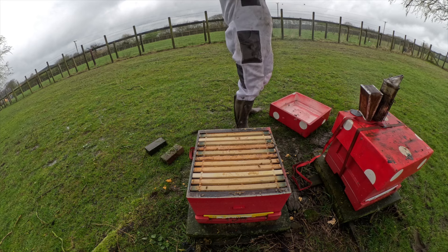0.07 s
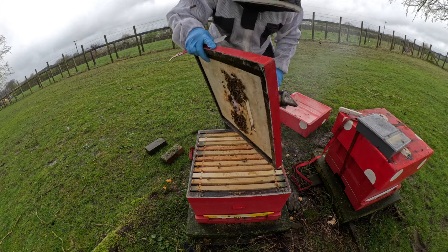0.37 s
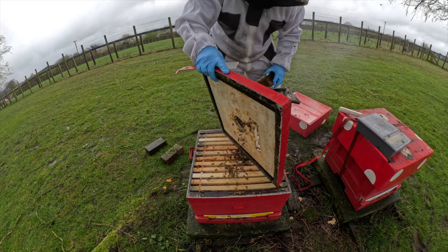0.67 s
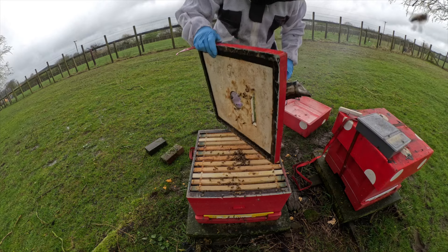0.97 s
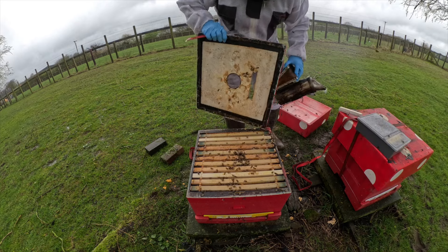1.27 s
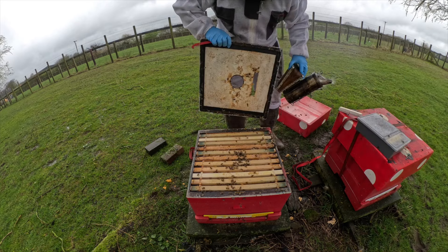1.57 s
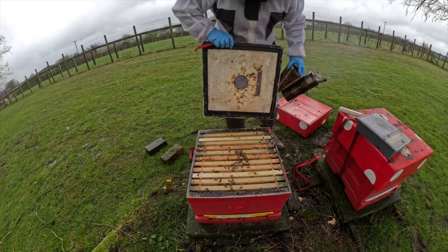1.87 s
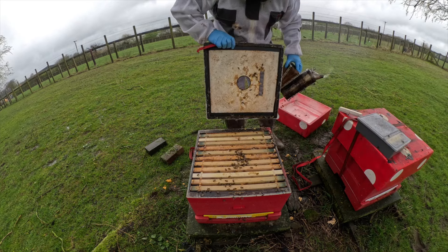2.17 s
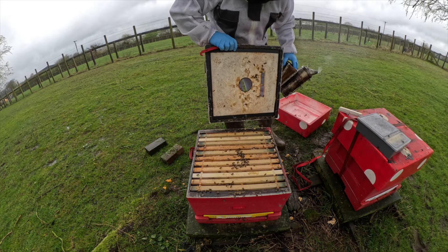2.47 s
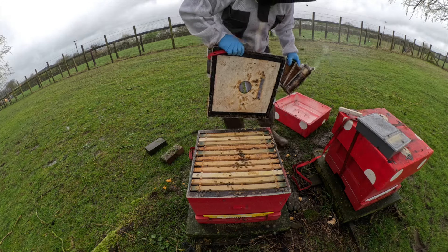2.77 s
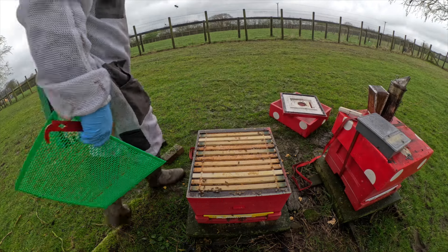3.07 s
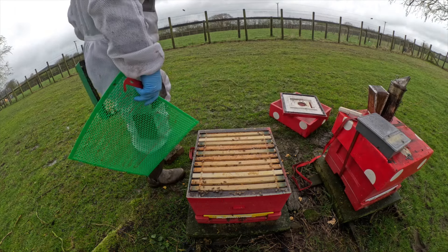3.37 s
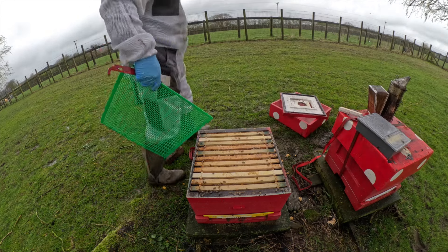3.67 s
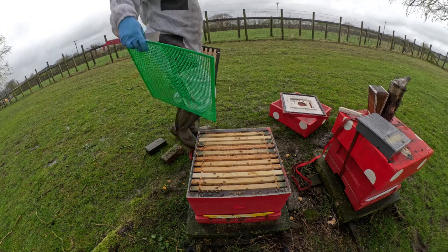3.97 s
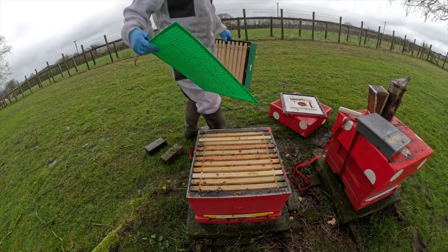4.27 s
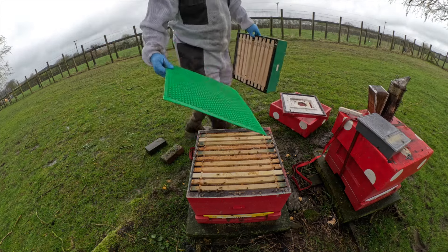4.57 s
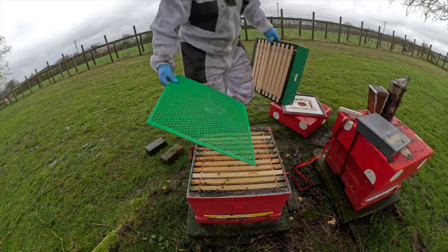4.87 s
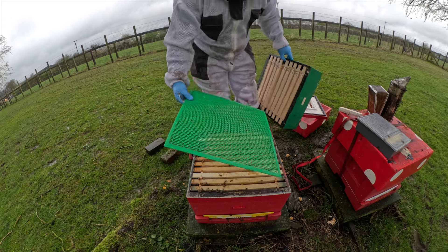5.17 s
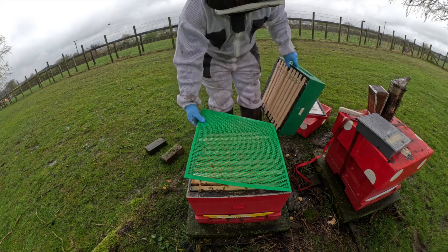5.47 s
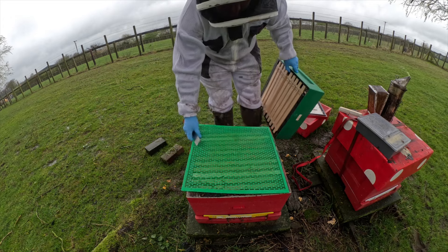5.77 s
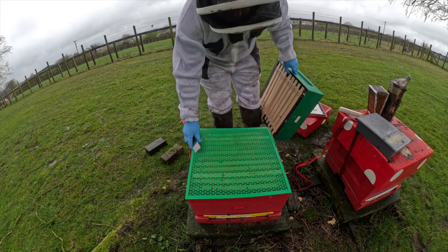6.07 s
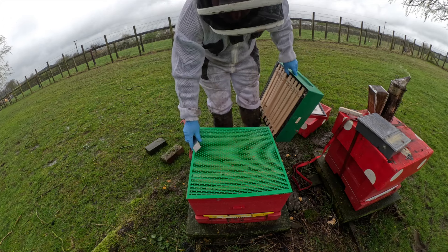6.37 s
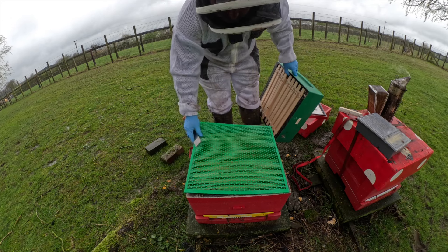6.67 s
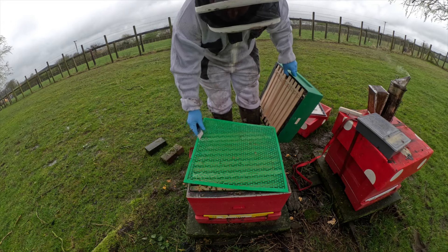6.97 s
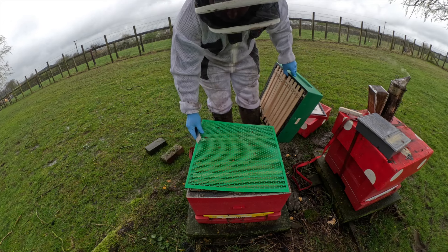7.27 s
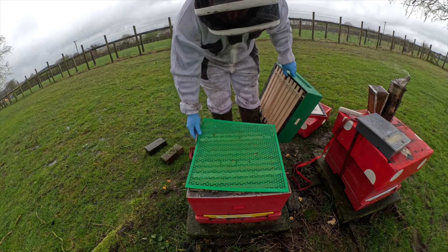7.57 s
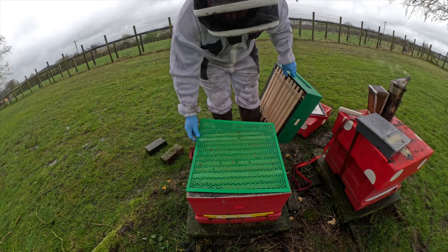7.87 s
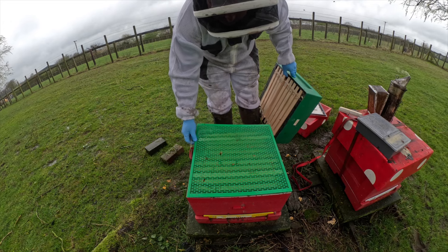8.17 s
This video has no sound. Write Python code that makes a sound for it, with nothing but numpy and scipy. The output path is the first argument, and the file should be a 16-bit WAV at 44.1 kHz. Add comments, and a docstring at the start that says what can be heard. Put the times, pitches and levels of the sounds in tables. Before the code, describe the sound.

One hard, hollow knock with a brief rattle cuts through the steady buzzing of bees right beside the microphone. A few bees dart past while a protective suit rustles and boots thud softly on turf. Light plastic clicks and a brief scrape follow as a grid goes onto the hive. The bees keep humming over a soft open-air rumble, with no echo.

```python
"""Open beehive on a lawn

Close to the frames, groups of bees hum, one pulse to a wing beat, and swell in turn. A sharp knock, likely
the smoker against the hive roof, booms and rattles once. The keeper steps round in a rustling suit and lays
a plastic grid on the frames with light clicks and a scrape. Far off: a faint bird and open-air rumble."""
import sys
import numpy as np
from scipy import signal
from scipy.fft import rfft, irfft, next_fast_len
from scipy.io import wavfile

SR = 44100
rng = np.random.default_rng(int(sys.argv[2]) if len(sys.argv) > 2 else 0)


def to_wav(s):
    """Save 16-bit WAV."""
    ch = np.atleast_2d(s).T  # columns
    pcm = np.round(np.clip(ch, -1, 1) * 32767)  # PCM
    wavfile.write(sys.argv[1], SR, pcm.astype(np.int16))


N = 363384
T = np.arange(N) / SR


def bees(wing_hz, tone, count, spread, wander, flutter_db):
    """Each bee sends one pulse per wing beat; its pitch wanders and its loudness changes as it turns."""
    t, pulses = T[::64], np.zeros(N + 1)
    mood = drift(t, 5)  # neighbours speed up and slow down together
    for offset in np.linspace(-1, 1, count):
        waver = drift(t, 3.5) + .45 * drift(t, 24) + .35 * mood
        hz = wing_hz * np.exp(spread * offset + wander * waver)
        beats = np.cumsum(hz) * t[1] + rng.random()
        beat_s = np.interp(np.arange(1, beats[-1]), beats, t)
        strength = undb(flutter_db * drift(beat_s, 7)) * np.exp(-offset ** 2 / 2)
        sample, fraction = (beat_s * SR).astype(int), beat_s * SR % 1
        pulses[sample] += strength * (1 - fraction)
        pulses[sample + 1] += strength * fraction
    return unit(colour(pulses[:N] - pulses.mean(), tone))


def near_bees():
    """Bees by the microphone fan on the combs, whine with folded wings, dart past and hover."""
    # Bouts of wing beats. Each row: peak in seconds, half width in seconds, relative level in dB.
    fan_bouts = [(0.14, 0.02, -51.5), (0.41, 0.072, -50), (0.8, .12, -54.5), (1.17, 0.24, -55.5),
                 (1.71, .16, -48.5), (2.26, .13, -50.5), (2.53, 0.12, -47.5), (2.88, 0.096, -48.5),
                 (3.22, 0.24, -55), (3.69, 0.096, -49), (4.3, 0.12, -54), (6.4, 0.17, -61.5),
                 (6.77, 0.091, -51.5)]
    dart_passes = [(3.27, 0.13, -48), (3.76, 0.16, -52), (4.33, 0.21, -59)]
    # Slow swells of the hum. Each row: time in seconds, relative level in dB.
    whine_levels = [(0, -89), (.35, -53.5), (1.1, -63), (1.6, -56.5), (2.85, -55), (3.1, -67.5),
                    (4.5, -59.5), (5.6, -56.5), (6.9, -53), (8.24, -54.5)]
    hover_levels = [(0, -65.5), (1.3, -66.5), (2.2, -60), (4.5, -64.5), (5.8, -55), (8.24, -55.5)]
    # Spectra of one wing beat. Each row: frequency in Hz, gain in dB.
    fan_tone = [(95, -32), (140, 1), (175, 1.5), (225, -2), (300, -20), (400, -27), (600, -19.5),
                (1200, -17), (2500, -38.5), (6000, -60)]
    whine_tone = [(250, -27.5), (430, 4), (560, 1), (950, -6), (1450, -12.5), (2400, -33), (6000, -63.5)]
    dart_tone = [(130, -50), (230, 8.5), (310, 10), (500, -10), (1200, -28), (2500, -26), (6000, -56.5)]
    hover_tone = [(110, -26), (220, -3.5), (330, -1), (450, -1), (680, -2), (900, -9.5), (1150, -8),
                  (1600, -24), (2500, -40), (6000, -57.5)]
    fanning = bees(188, fan_tone, count=20, spread=.22, wander=.055, flutter_db=2.8)
    whining = bees(482, whine_tone, count=12, spread=.11, wander=.04, flutter_db=3.2)
    darting = bees(262, dart_tone, count=9, spread=.11, wander=.033, flutter_db=3)
    hovering = bees(225, hover_tone, count=13, spread=.05, wander=.028, flutter_db=3.9)
    hovering *= undb(drift(T, 5.5))
    stragglers = bees(205, hover_tone, count=9, spread=.14, wander=.04, flutter_db=1.4)
    return (fanning * surges(fan_bouts, rest_db=-60.5) * undb(-1)
            + whining * swell(whine_levels) * undb(-2.5)
            + darting * surges(dart_passes, rest_db=-74)
            + (hovering + stragglers * undb(-5.5)) * swell(hover_levels))


def colony():
    """Down in the hive many wing beats blur into a drone, with a fine hiss of wings between the frames."""
    # Swells of drone and hiss. Each row: time in seconds, relative level in dB.
    drone_levels = [(0, -63), (1.4, -62), (2.55, -56.5), (3.1, -62), (4.6, -59.5), (5.05, -55.5),
                    (5.4, -60), (8.24, -62)]
    hiss_levels = [(0, -95), (4.5, -87), (5.4, -78.5), (8.24, -77)]
    # Their spectra. Each row: frequency in Hz, gain in dB.
    drone_tone = [(200, -21.5), (400, 8.5), (600, -3.5), (1000, 1.5), (1350, -1), (1800, -7.5),
                  (2500, -22.5), (4000, -23.5), (6500, -32), (9000, -48)]
    hiss_tone = [(2000, -28), (3200, -18), (3900, -5), (4850, 2.5), (5600, -2.5), (6400, -11.5),
                 (7150, -10.5), (8100, -14), (9200, -21.5), (15000, -28.5)]
    drone = bees(235, drone_tone, count=24, spread=.25, wander=.05, flutter_db=3.5)
    hiss = noise(hiss_tone) * swell(hiss_levels) * undb(1.13 * drift(T, 13))
    return drone * swell(drone_levels) * undb(1.5) + hiss


def knock():
    """A quick run of contacts rings the hollow roof and the smoker's tin; the hard ones crack."""
    # Smoker meeting roof. Each row: start in seconds, relative level in dB, contact time in ms.
    contacts = [(0.4885, -22.9, 0.07), (0.49001, -10.3, 0.29), (0.49212, -9.0, 0.15), (0.49472, -9.1, 0.05),
                (0.49772, -14.1, 0.29), (0.50176, -14.1, 0.72), (0.50587, -24.9, 0.18),
                (0.51424, -39.5, 0.1), (0.5355, -42, 0.22), (0.54607, -40.5, 0.17), (0.5535, -37, 0.21),
                (0.56317, -40, 0.27), (0.577, -48, 0.25)]
    # Modes of roof and tin. Each row: frequency in Hz, gain in dB, seconds to fall 60 dB.
    roof_modes = [(133, -0.8, 0.137), (180, 2.9, 0.056), (213, -0.9, 0.085), (324, -5.3, 0.101),
                  (476, -8.7, 0.131), (534, -1.4, 0.045), (602, 2.9, 0.062), (683, 5.2, 0.021),
                  (791, 1.2, 0.03), (866, -9.1, 0.088), (976, 3.0, 0.057), (1100, -6.0, 0.062),
                  (1200, -0.2, 0.019), (1276, -4.2, 0.042), (1358, 2.2, 0.039), (1490, -2.2, 0.043),
                  (1644, 0.4, 0.015), (1823, -0.3, 0.066), (2052, -14.0, 0.042), (2444, 0.5, 0.011),
                  (2636, -8.0, 0.039), (2794, -14.3, 0.029), (3052, -13.3, 0.037), (3251, -9.0, 0.03),
                  (3773, -8.2, 0.036)]
    tin_modes = [(4020, -12, .018), (5400, -14, .018), (6450, -10, .018), (6950, -14, .018),
                 (9600, -11, .018), (12500, -17, .015)]
    # Spectrum of the crack. Each row: frequency in Hz, gain in dB.
    crack_tone = [(60, -10), (300, -8), (1200, -10), (2500, -10.5), (4000, -7.5), (5000, -16),
                  (7000, -18.5), (9500, -11.5), (13000, -22.5), (16000, -30)]
    t, pushes, cracks = T[:SR // 2], np.zeros(N), np.zeros(N)
    fade = (np.exp(-t / .0014) + .22 * np.exp(-t / .0105)
            + .014 * np.exp(-t / .033) + .0015 * np.exp(-t / .08))
    for start, db, contact_ms in contacts:
        push = t * np.exp(-t * 2000 / contact_ms)
        hardness = 1 / (1 + (contact_ms / .13) ** 2)
        add(pushes, start, undb(db) * push / push.sum())
        add(cracks, start, undb(db) * hardness * fade * rng.standard_normal(len(t)))
    boom = signal.fftconvolve(pushes, ring(roof_modes, t) + ring(tin_modes, t))[:N]
    out = undb(.5) * boom + undb(3.5) * colour(cracks, crack_tone)
    # a deep thud as the blow shakes the microphone
    add(out, .51, ring([(19, -24.5, .19), (65, -36.5, .12)], t))
    add(out, .5445, ring([(7900, -58, .07), (11900, -66, .05)], t))  # the tin pings on the bounce
    return out


def suit():
    """Cloth rubs on cloth and the mesh snaps with each stroke; the suit flaps dully as the keeper shifts."""
    # Bending and reaching. Each row: start in seconds, length in seconds, relative level in dB.
    strokes = [(0, 0.29, -72), (.62, 0.15, -77), (1.42, 0.072, -79.5), (2.964, 0.17, -63),
               (3.129, 0.037, -59), (3.18, 0.7, -72.5), (3.335, 0.11, -70.5), (3.51, 0.4, -74.5),
               (3.59, 0.11, -68), (3.986, 0.51, -68), (4.272, 0.097, -64), (4.583, 0.062, -70),
               (4.83, 0.3, -75), (5.116, 0.056, -65)]
    # Shifts of weight. Each row: peak in seconds, half width in seconds, level in dB.
    shifts = [(0.05, .25, -67), (3.22, 0.23, -55), (4.15, 0.79, -60), (5.2, 0.41, -57.5), (7.45, .7, -61)]
    # Spectra of rustle, snap and flap. Each row: frequency in Hz, gain in dB.
    cloth_tone = [(300, -7.5), (1500, 5.5), (3000, 6), (4500, 2), (6000, 3.5), (7500, -2), (9200, -2),
                  (12000, -7), (15500, -10)]
    snap_tone = [(1500, -28), (4000, -9), (8500, 0), (12000, -3.5), (15500, -5.5)]
    flap_tone = [(30, -13), (85, 1), (130, -2), (330, -8), (700, -23), (2000, -48)]
    attack_s, release_s, rest_db = .022, .016, -83
    power = undb(rest_db) ** 2
    for start, length, db in strokes:
        attack = np.clip((T - start) / attack_s, 0, 1)
        release = np.exp(-np.clip(T - start - length, 0, 1) / release_s)
        power += (undb(db) * attack * release) ** 2
    cloth = rubbing(cloth_tone, catches_per_s=420, hiss=1)
    snaps = rubbing(snap_tone, catches_per_s=60, hiss=0)
    rustle = cloth * undb(-.16 + .9 * drift(T, 70)) + snaps * undb(-8.5)
    return rustle * np.sqrt(power) + noise(flap_tone) * surges(shifts, rest_db=-76)


def grid_clicks():
    """Taps on plastic land edge first, then flat; each contact wakes its own range and mix of modes."""
    # Taps of grid and tool. Each row: start in seconds, relative level in dB, low and high band edge in Hz.
    taps = [(0.053, -52, 7000, 9500), (2.43, -57, 2000, 5000), (3.178, -50, 6000, 12000),
            (3.301, -50, 3980, 9900), (3.382, -58, 5000, 13000), (3.63, -51.5, 2200, 5000),
            (3.8887, -40.5, 580, 3840), (4.169, -52, 7000, 9850), (4.447, -56, 1600, 2580),
            (4.985, -48, 1880, 5530), (5.0494, -43.5, 1480, 2430), (5.411, -58, 2490, 6000),
            (5.527, -49.5, 1800, 7500), (5.721, -55, 2800, 4600), (5.741, -58.5, 6000, 8900),
            (5.928, -57, 1200, 3800)]
    # Modes of grid and hive rim. Each row: frequency in Hz, gain in dB, seconds to fall 60 dB.
    grid_modes = [(673, 5.5, 0.067), (1140, 5.5, 0.02), (1360, -6, 0.025), (1600, 3, 0.026),
                  (1900, -4, 0.03), (2260, -5, 0.015), (2860, -5, 0.01), (3450, -8.5, 0.024),
                  (5600, -8, 0.011), (8100, -24, 0.013)]
    bounce_s, bounce_db = .004, 1.5
    t, out = T[:SR // 8], np.zeros(N)
    for start, db, low_hz, high_hz in taps:
        band = signal.butter(2, [low_hz, high_hz], "band", fs=SR, output="sos")
        for delay, contact_db in ((0, db), (bounce_s, db + bounce_db)):
            modes = [(hz * (1 + .02 * rng.standard_normal()), gain + 2 * rng.standard_normal(), t60)
                     for hz, gain, t60 in grid_modes]
            tick = .8 * np.exp(-t / .003) * rng.standard_normal(len(t))
            add(out, start + delay, undb(contact_db) * signal.sosfilt(band, ring(modes, t) + tick))
    return out


def grid_scrape():
    """The plastic grid drags briefly over the hive rim."""
    # Course of the slide. Each row: time in seconds, level in dB.
    levels = [(0, -110), (5.06, -100), (5.11, -62), (5.14, -50.5), (5.18, -58.5), (5.22, -60), (5.26, -69),
              (5.32, -100)]
    # Spectrum of plastic on the rim. Each row: frequency in Hz, gain in dB.
    tone = [(800, -19), (1400, -0.5), (1750, 4.5), (2200, -5.5), (2750, -5), (3400, -17), (8000, -34)]
    return rubbing(tone, catches_per_s=900, hiss=.4) * swell(levels)


def steps():
    """A boot gives one or two dull cycles on soft ground."""
    # Boots on turf. Each row: start in seconds, level in dB, pitch in Hz.
    footfalls = [(3.303, -30, 105), (5.691, -38, 95)]
    t, out = T[:SR // 8], np.zeros(N)
    for start, db, hz in footfalls:
        add(out, start, undb(db) * np.sin(2 * np.pi * hz * t) * np.exp(-(t / .0086) ** 2))
    return out


def sizzle():
    """A thin, flickering band of hiss over the open frames sinks in pitch."""
    # Swell of the hiss. Each row: time in seconds, level in dB.
    levels = [(4.9, -105), (5.3, -85), (6.4, -82.5), (7.2, -88)]
    # Its glide. Each row: time in seconds, band centre in Hz.
    glide = [(5.3, 7900), (5.8, 7550), (6.2, 7020)]
    low_noise = signal.sosfilt(signal.butter(2, 600, fs=SR, output="sos"), rng.standard_normal(N))
    centre_hz = np.interp(T, *np.transpose(glide))
    band = low_noise * np.sin(2 * np.pi * np.cumsum(centre_hz) / SR)
    return unit(band) * swell(levels) * undb(1.5 * drift(T, 18))


def bird():
    """A distant bird whistles nearly pure notes that sag a little in pitch."""
    # Whistles. Each row: start and length in seconds, first and last pitch in Hz, level in dB.
    whistles = [(0.295, .2, 4210, 3994, -77), (1.1, .35, 3850, 3760, -86)]
    out = np.zeros(N)
    for start, length, first_hz, last_hz, db in whistles:
        t = T[:int(length * SR)]
        hz = np.interp(t, [0, length], [first_hz, last_hz]) * (1 + .006 * drift(t, 90))
        add(out, start, undb(db) * np.sin(np.pi * t / length) * np.sin(2 * np.pi * np.cumsum(hz) / SR))
    return out


def air():
    """Open air over the lawn: a low wavering rumble with a faint hiss."""
    # Swell of the rumble. Each row: time in seconds, level in dB.
    levels = [(0, -53.5), (1.2, -60), (2.8, -57.5), (5.4, -55.5), (8.24, -57.5)]
    # Its spectrum. Each row: frequency in Hz, gain in dB.
    tone = [(10, -16.5), (28, 1), (70, -1), (105, -9.5), (300, -13), (1000, -20.5), (2500, -33.5),
            (5000, -47), (9000, -48), (16000, -51)]
    return noise(tone) * swell(levels) * undb(.46 * drift(T, 3.9))


def rubbing(tone, catches_per_s, hiss):
    """Sliding surfaces slip in countless tiny catches, some stronger than the rest."""
    strength = undb(3.2 * np.minimum(rng.exponential(size=N), 3.2))
    catches = (rng.random(N) < catches_per_s / SR) * rng.choice([-1, 1], N) * strength
    return unit(colour(unit(catches) + hiss * rng.standard_normal(N), tone))


def ring(modes, t):
    """A struck body's decaying modes; neighbours swing in opposite directions."""
    return sum((-1) ** k * undb(db - 60 * t / t60) * np.sin(2 * np.pi * hz * t)
               for k, (hz, db, t60) in enumerate(modes))


def colour(x, tone):
    """Minimum-phase filter with the given (Hz, dB) spectrum."""
    hz, db = np.transpose(tone)
    size = 2 * next_fast_len(len(x) // 2 + 2048)
    bin_hz = np.arange(size // 2 + 1) * SR / size
    gain = undb(np.interp(np.log(bin_hz + 1), np.log(hz), db))
    cepstrum = irfft(np.log(gain))
    cepstrum[1:size // 2] *= 2
    cepstrum[size // 2 + 1:] = 0
    return irfft(rfft(x, size) * np.exp(rfft(cepstrum)))[:len(x)]


def noise(tone):
    """Noise of rms 1 with the given (Hz, dB) spectrum."""
    return unit(colour(rng.standard_normal(N), tone))


def surges(rows, rest_db):
    """Gain over time: bell-shaped swells whose power adds to a resting level."""
    power = sum(undb(db) ** 2 * np.exp(-((T - peak) / width) ** 2) for peak, width, db in rows)
    return np.sqrt(undb(rest_db) ** 2 + power)


def swell(curve):
    """Gain over time from (seconds, dB) rows."""
    return undb(np.interp(T, *np.transpose(curve)))


def drift(t, rate):
    """Random drift through `rate` points a second, spread near 1."""
    points = rng.standard_normal(1024)
    return np.interp(t * rate, np.arange(len(points)), points) * np.sqrt(3 / 2)


def add(out, start, x):
    """Mix x into out from `start` seconds."""
    i = int(start * SR)
    out[i:i + len(x)] += x[:len(out) - i]


def undb(db):
    """Decibels to gain."""
    return 10 ** (np.asarray(db) / 20)


def unit(x):
    """Scale to rms 1."""
    return x / np.sqrt(np.mean(x ** 2))


def scene():
    """One microphone beside the hive, out in the open with no reverberation."""
    hive = near_bees() + colony() + sizzle()
    keeper = suit() + knock() + grid_clicks() + grid_scrape() + steps()
    return (hive + keeper + bird() + air())[None]


def record(dry):
    """The recorder rounds the loudest peaks and cuts the top."""
    top_hz = 15800
    return signal.sosfilt(signal.ellip(10, .2, 70, top_hz, fs=SR, output="sos"), np.tanh(dry))


dry = scene()
out = record(dry)
to_wav(out)
```